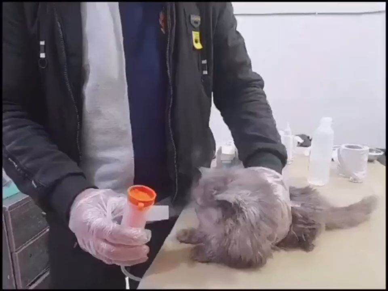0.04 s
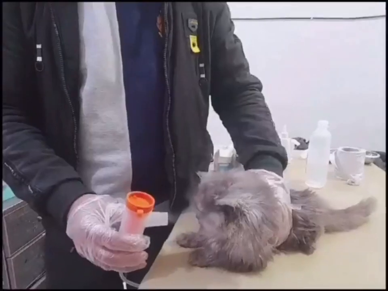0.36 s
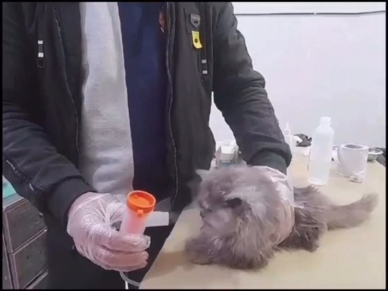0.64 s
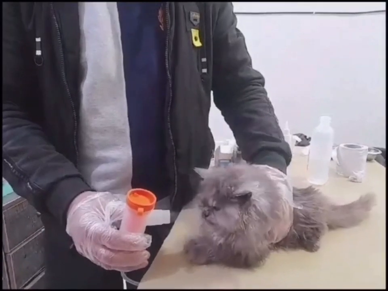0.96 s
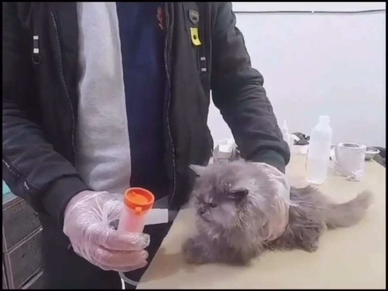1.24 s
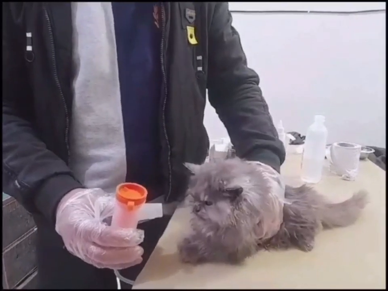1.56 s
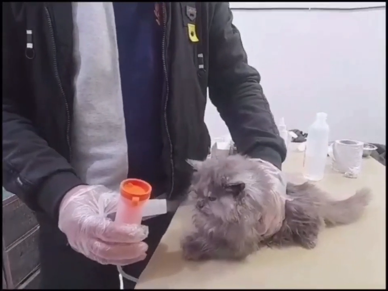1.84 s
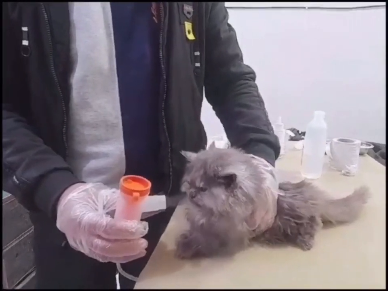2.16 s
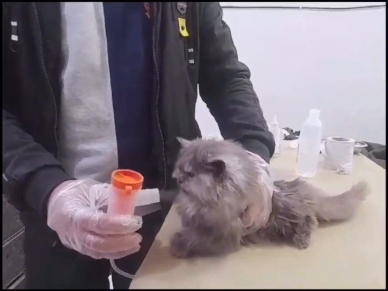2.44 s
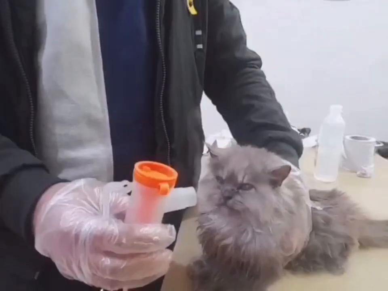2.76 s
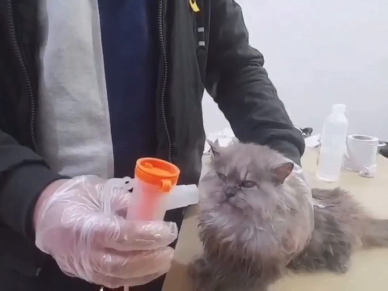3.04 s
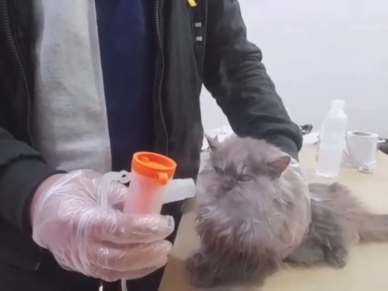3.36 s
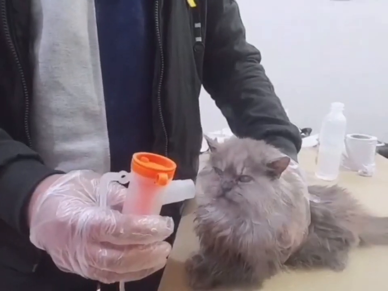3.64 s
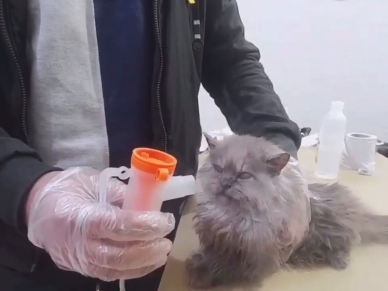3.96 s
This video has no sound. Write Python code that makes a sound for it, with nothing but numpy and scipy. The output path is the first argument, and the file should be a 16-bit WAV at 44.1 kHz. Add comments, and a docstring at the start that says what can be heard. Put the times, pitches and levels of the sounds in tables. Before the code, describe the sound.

A nebulizer hisses and spits steadily over the hum of its small compressor.

```python
"""First comes the spitting hiss of a hand-held nebulizer cup, over a humming compressor in a small room.
The piston chatters and drives an air jet that tears up the liquid; single drops make the cup tick.
The hiss changes colour as the mouthpiece turns. After a brief dropout the microphone hears it all
from closer by, and a low drone swells and fades underneath."""
import sys
import numpy as np
from scipy import signal
from scipy.fft import rfft, irfft, next_fast_len
from scipy.io import wavfile
from scipy.ndimage import uniform_filter1d, map_coordinates

SR = 44100
rng = np.random.default_rng(int(sys.argv[2]) if len(sys.argv) > 2 else 0)


def bounce(signal):
    """Save signal as a 16-bit WAV file at the path given by the first command-line argument."""
    frames = np.transpose(np.atleast_2d(signal))
    limited = np.clip(frames, -1, 1)
    pcm = np.round(limited * 32767).astype(np.int16)
    wavfile.write(sys.argv[1], SR, pcm)


N = 176400
T = np.arange(N) / SR
START_S, DROPOUT_S, NEAR_S = 0.02195, 2.482, 2.546
SHAFT_HZ, PUFF_TURNS = 45.53, .1
TURN_MIDDLE_S, TURN_LENGTH_S = 1.39, 0.21
SPITS_PER_S, SPIT_SPREAD_DB, SPIT_DECAY_S = 520, 3.5, .0008
DROPS_PER_S, PING_RISE_S = 60, 0.0011
ROOM_T60_S, ROOM_DB = 0.13, -8
MIC_TOP_HZ = 12450

# colour of the room rumble: frequency_hz, relative_db
RUMBLE_SPECTRUM = [(20, -27), (33, -27), (42, -1.5), (58, -0.5), (75, -1.5), (86, 4.5), (100, -9),
                   (133, 2.5), (155, -3), (190, -18), (300, -38), (600, -63)]
# level of the room rumble: time_s, level_db
RUMBLE_LEVELS = [(0.1, -41), (.8, -43), (1.6, -44.5), (2.45, -42.5), (2.7, -41.5), (3.3, -41.5), (4.0, -43)]
# upper tone of the drone: time_s, pitch_hz, level_db
DRONE_PATH = [(2.55, 107.5, -49), (2.75, 109.8, -42), (2.9, 110, -40), (3.15, 110.6, -39.5),
              (3.35, 111.6, -34.5), (3.47, 113, -43), (4.0, 113.6, -58)]
# lower tone of the drone: time_s, level_db
UNDERTONE_LEVELS = [(2.55, -39.5), (2.78, -42), (2.95, -44), (3.5, -58), (4.0, -62)]
# piston hum at the far and near microphone positions: shaft_multiple, level_db
FAR_HARMONICS = [(1, -49.0), (2, -53.0), (3, -50.5), (4, -52.5), (5, -50.0), (6, -57.5), (7, -47.5),
                 (8, -55.0), (9, -58.0), (10, -71.0), (11, -42.5), (12, -54.5), (13, -61.5), (14, -59.5),
                 (15, -56.5), (16, -69.0), (17, -57.0), (18, -59.0), (19, -69.0), (20, -70.0), (21, -69.0),
                 (22, -68.0), (23, -66.5), (24, -68.5), (25, -71.5), (26, -71.0), (27, -66.5), (28, -71.0),
                 (29, -64.0), (30, -75.5), (31, -69.0), (32, -73.0), (33, -70.5), (34, -73.0), (35, -69.0),
                 (37, -66.5), (38, -61.5), (39, -62.0), (40, -76.5)]
NEAR_HARMONICS = [(1, -58.5), (2, -53.0), (3, -48.0), (4, -56.5), (5, -48.0), (6, -52.0), (7, -47.5),
                  (8, -54.0), (9, -55.5), (11, -48.5), (12, -52.5), (13, -63.0), (14, -60.0), (15, -63.5),
                  (16, -62.5), (17, -63.5), (18, -57.5), (19, -71.5), (20, -70.0), (21, -71.0), (22, -68.0),
                  (23, -59.5), (24, -69.5), (25, -64.0), (26, -71.5)]
# valve puffs within one shaft turn: start_turns, relative_db
VALVE_PUFFS = [(0.201, -9.5), (0.399, -4), (0.681, -10), (0.919, -4)]
# air noise of the pump, far and near: frequency_hz, relative_db
FAR_AIR_SPECTRUM = [(90, -27), (180, -2), (250, -3), (330, 1.5), (440, -11.5), (560, -8), (780, -11),
                    (950, -13), (1250, -15), (1600, -14), (2700, -16), (3300, -20.5), (4400, -43)]
NEAR_AIR_SPECTRUM = [(90, -20.5), (180, 1), (250, -3), (330, -2.5), (440, -10), (560, -10), (780, -14),
                     (950, -17.5), (1250, -19), (1550, -13.5), (2000, -18), (2700, -19), (3300, -27.5),
                     (4400, -46)]
# level of the jet: time_s, level_db
JET_LEVELS = [(0.05, -30.5), (.3, -32), (.5, -30.5), (.75, -31), (1.1, -30.5), (1.5, -28), (2.45, -28),
              (2.56, -27), (2.9, -28.5), (3.3, -29), (3.55, -28), (4.0, -27.8)]
# colour of the jet at first, with the mouthpiece turned, and close up: frequency_hz, relative_db
FIRST_JET_SPECTRUM = [(2000, -60), (3400, -35.5), (3560, -25.5), (3980, -19.0), (4340, -23.0),
                      (4680, -12.5), (5430, -13.0), (5700, 0.0), (6090, -2.5), (6260, -10.5), (6370, -7.0),
                      (6660, -14.0), (6850, -19.0), (7810, -17.0), (7910, -20.5), (8100, -42.0),
                      (8940, -26.0), (9290, -28.0), (9580, -13.5), (9650, -12.5), (9830, -18.0),
                      (10520, -17.5), (11080, -33.0), (11460, -35.5), (11740, -27.5), (12250, -39.5),
                      (12600, -55)]
TURNED_JET_SPECTRUM = [(2000, -60), (3400, -38.5), (3990, -23.0), (4350, -30.0), (4720, -10.0),
                       (5050, -14.0), (5470, -13.0), (5610, -4.0), (5840, 0.0), (6070, -5.5), (6290, -6.0),
                       (6490, -13.5), (7210, -24.5), (7340, -42.0), (7490, -41.5), (7770, -27.0),
                       (8130, -37.0), (8940, -27.0), (9190, -36.5), (9590, -23.0), (9980, -29.0),
                       (10480, -22.0), (10980, -28.5), (11210, -42.0), (11790, -32.0), (12250, -42.0),
                       (12600, -55)]
NEAR_JET_SPECTRUM = [(2000, -60), (3400, -40.5), (3600, -27.0), (3980, -20.5), (4190, -29.0), (4510, -26.0),
                     (4740, -14.5), (5050, -21.0), (5300, -13.5), (5710, 0.0), (6030, -6.5), (6230, -13.5),
                     (6420, -14.0), (7280, -28.5), (7820, -19.5), (8070, -42.0), (8300, -42.0),
                     (8810, -28.0), (9190, -30.5), (9560, -18.0), (9910, -26.5), (10160, -21.0),
                     (10880, -25.5), (11310, -40.5), (11690, -29.0), (12250, -39.0), (12600, -55)]
# resonances of the cup: pitch_hz, relative_db
CUP_RESONANCES = [(4790, -15), (5770, 1), (9620, -21)]
# loudest spits of liquid: start_s, relative_db
LOUD_SPITS = [(0.6694, -23), (0.824, -19.5), (1.407, -17), (1.9753, -17), (2.384, -14), (2.5488, -18.5),
              (2.5935, -20), (2.9826, -15), (2.9941, -17), (3.02, -18), (3.1906, -19), (3.278, -14),
              (3.4994, -17.5), (3.6523, -15.5), (3.6748, -20), (3.8492, -15), (3.8741, -17),
              (3.9447, -16.5)]


def amp(db):
    """Decibels to gain."""
    return 10 ** (np.asarray(db) / 20)


def unit(x):
    """Scale to rms 1."""
    return x / np.sqrt(np.mean(x ** 2) + 1e-20)


def wobble(knots_per_s):
    """A smooth random curve."""
    return map_coordinates(rng.standard_normal(1024), [T * knots_per_s], mode="wrap")


def level(rows):
    """Gain per sample from rows of time_s, level_db."""
    return amp(np.interp(T, *np.transpose(rows)))


def coloured(x, spectrum):
    """Pass x through a resonant body with this spectrum; the result has rms 1."""
    size = 2 * next_fast_len(N)
    hz, db = np.transpose(spectrum)
    gain = amp(np.interp(np.log(np.fft.rfftfreq(size, 1 / SR) + 1), np.log(hz + 1), db))
    cepstrum = irfft(np.log(np.maximum(gain, 1e-6)))
    cepstrum[1:size // 2] *= 2  # minimum phase: the body rings only after it is driven
    cepstrum[size // 2 + 1:] = 0
    return unit(irfft(rfft(x, size) * np.exp(rfft(cepstrum)))[:N])


def room_rumble():
    """Low noise of the room, lying under everything."""
    return level(RUMBLE_LEVELS) * coloured(rng.standard_normal(N), RUMBLE_SPECTRUM)


def drone():
    """Two low tones at the near position: the upper swells and fades, the lower dies away."""
    time_s, pitch_hz, level_db = np.transpose(DRONE_PATH)
    phase = 2 * np.pi * np.cumsum(np.interp(T, time_s, pitch_hz)) / SR
    upper = amp(np.interp(T, time_s, level_db)) * np.sin(phase)
    lower = level(UNDERTONE_LEVELS) * np.sin(.735 * phase + .5 * wobble(8))
    return np.sqrt(2) * (T > NEAR_S) * (upper + lower)


def room(x, positions=20):
    """Add the short tail of a small room, ever changing as the hand moves."""
    t = T[:SR // 4]
    tails = rng.standard_normal((positions, len(t))) * amp(-60 * t / ROOM_T60_S)
    wet = np.zeros(N + len(t))
    for span, tail in zip(np.array_split(np.arange(N), positions), tails):
        echo = signal.fftconvolve(x[span], tail / np.linalg.norm(tail))
        wet[span[0]:span[0] + len(echo)] += echo
    return x + amp(ROOM_DB) * wet[:N]


def compressor(harmonics, air_spectrum, air_db):
    """The piston stroke hums in harmonics, and air puffs through the valves on every turn."""
    turns = np.cumsum(SHAFT_HZ * (1 + .0007 * wobble(6))) / SR
    hum = np.zeros(N)
    for multiple, db in harmonics:
        fluttering_gain = amp(db + .7 * wobble(6.99))
        hum += fluttering_gain * np.sin(2 * np.pi * (multiple * turns + rng.random()))
    puffs = unit(sum(amp(db) * np.exp(-((turns - start) % 1) / PUFF_TURNS) for start, db in VALVE_PUFFS))
    air = (2.2 + puffs) * rng.standard_normal(N)  # puffs ride on a steady flow
    return np.sqrt(2) * hum + amp(air_db) * coloured(air, air_spectrum)


def cup_pings():
    """Single drops set the cup ringing for a few milliseconds; the loudest stand out as ticks."""
    drop_s = rng.random(round(DROPS_PER_S * T[-1])) * T[-1]
    drop_db = np.interp(drop_s, *np.transpose(JET_LEVELS)) - .5
    ticks = [(start_s, db - 2) for start_s, db in LOUD_SPITS]
    t = T[:SR // 50]
    envelope = t / PING_RISE_S * np.exp(1 - t / PING_RISE_S)
    pings = np.zeros(N + len(t))
    for start_s, db in ticks + list(zip(drop_s, drop_db)):
        detune = 1 + .009 * rng.standard_normal()
        ring = sum(amp(mode_db) * np.sin(2 * np.pi * hz * detune * t) for hz, mode_db in CUP_RESONANCES)
        pings[round(start_s * SR):][:len(t)] += amp(db) * envelope * ring
    return room(pings[:N])


def jet():
    """Steady air plus random spits of liquid, each a snap and a tiny burst, coloured by the cup."""
    onsets = rng.random(N) < SPITS_PER_S / SR
    spits = onsets * amp(SPIT_SPREAD_DB * np.minimum(rng.standard_normal(N), 2))
    burst_power = signal.lfilter([1], [1, -np.exp(-1 / (SR * SPIT_DECAY_S))], spits ** 2)
    spray = amp(-5) * unit(np.sqrt(np.abs(burst_power)) * rng.standard_normal(N))
    snaps = amp(-8.5) * unit(spits * rng.choice([-1, 1], N))
    steady_air = .8 * rng.standard_normal(N)
    hiss = room(steady_air + spray + snaps)
    turned = np.clip((T - TURN_MIDDLE_S) / TURN_LENGTH_S + .5, 0, 1)
    far = (1 - turned) * coloured(hiss, FIRST_JET_SPECTRUM) + turned * coloured(hiss, TURNED_JET_SPECTRUM)
    near = coloured(hiss, NEAR_JET_SPECTRUM)
    flow = level(JET_LEVELS) * amp(.53 * wobble(24.73))
    return flow * np.where(T < NEAR_S, far, near)


def scene():
    """Room, compressor and cup on one microphone, first farther off and then close by."""
    far = compressor(FAR_HARMONICS, FAR_AIR_SPECTRUM, air_db=-43.5)
    near = compressor(NEAR_HARMONICS, NEAR_AIR_SPECTRUM, air_db=-41)
    pump = np.where(T < NEAR_S, far, near)
    return (room_rumble() + drone() + pump + cup_pings() + jet())[None]


def record(dry):
    """The sound begins, drops out briefly and returns from closer by; the microphone misses the top treble."""
    sounding = ((T > START_S) & (T < DROPOUT_S)) | (T > NEAR_S)
    gate = uniform_filter1d(sounding.astype(float), size=64)
    passband = np.fft.rfftfreq(2 * N, 1 / SR) < MIC_TOP_HZ
    return irfft(rfft(dry * gate, 2 * N) * passband)[:, :N]


dry = scene()
out = record(dry)
bounce(out)
```